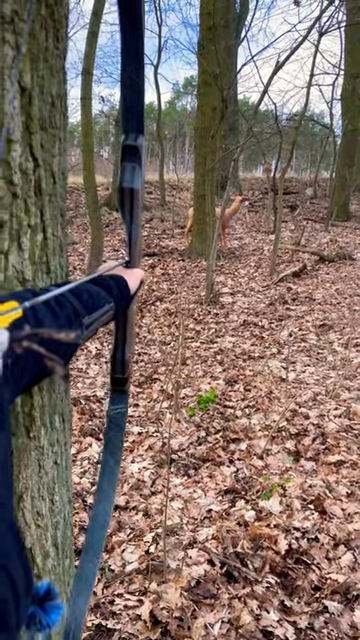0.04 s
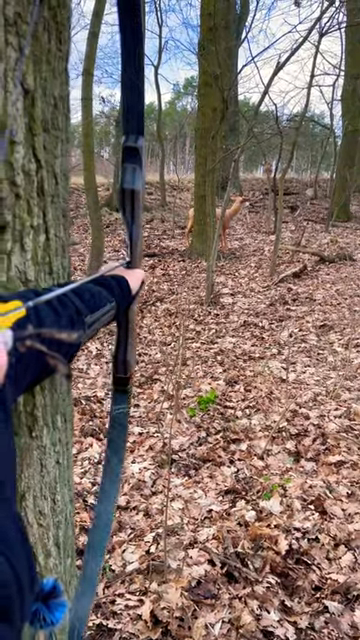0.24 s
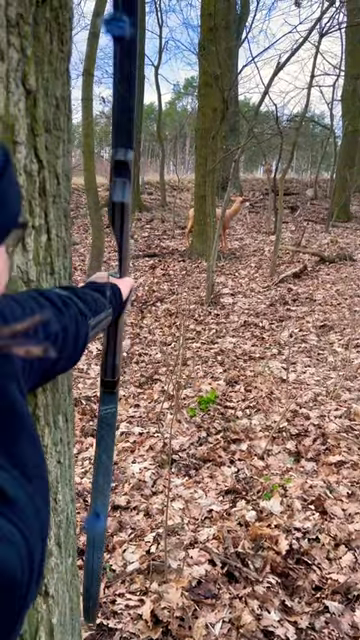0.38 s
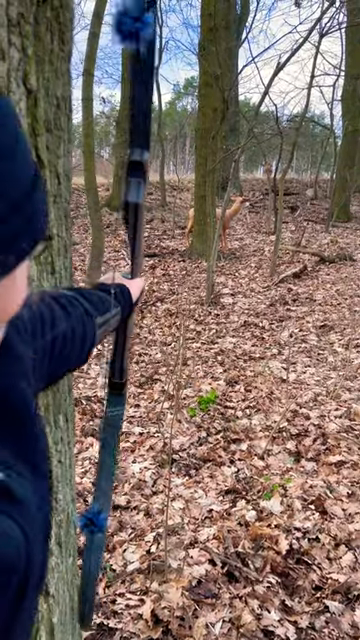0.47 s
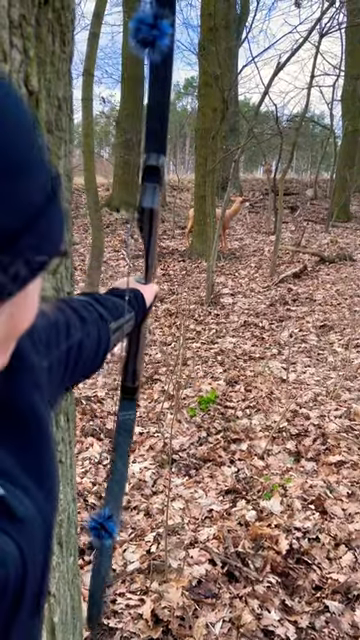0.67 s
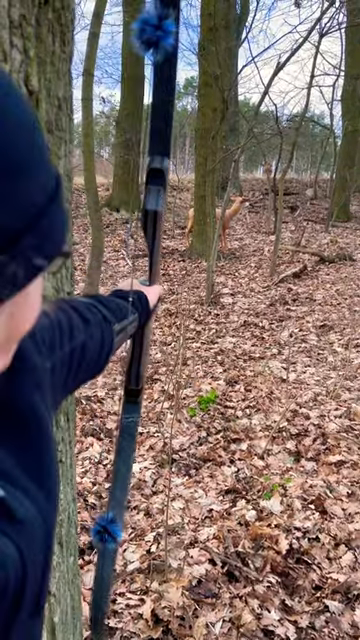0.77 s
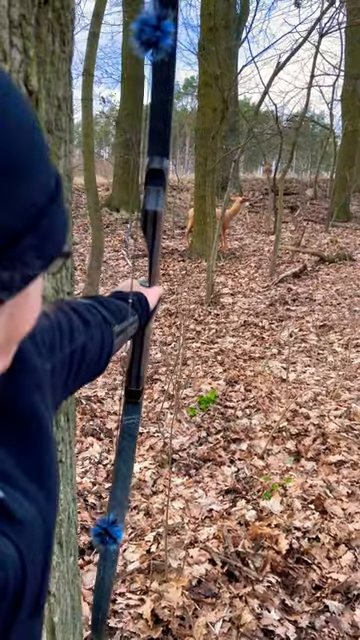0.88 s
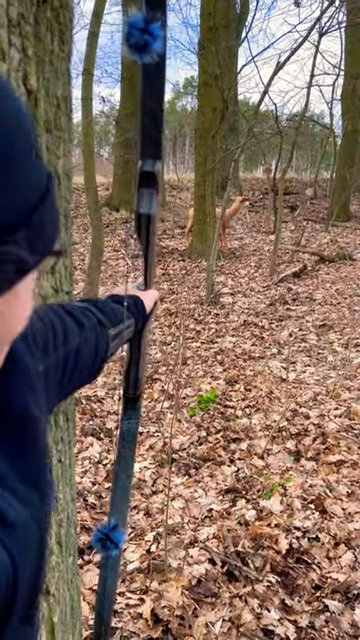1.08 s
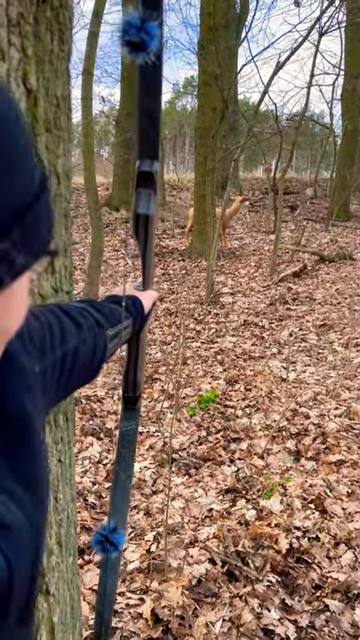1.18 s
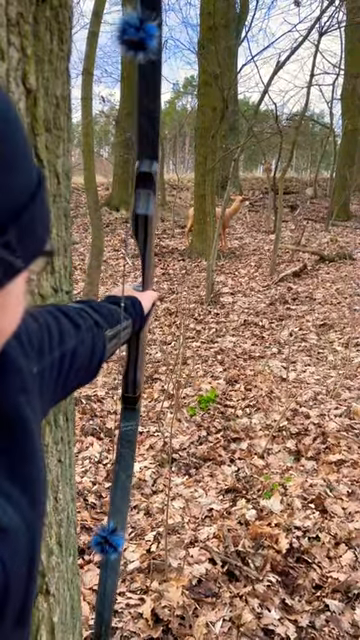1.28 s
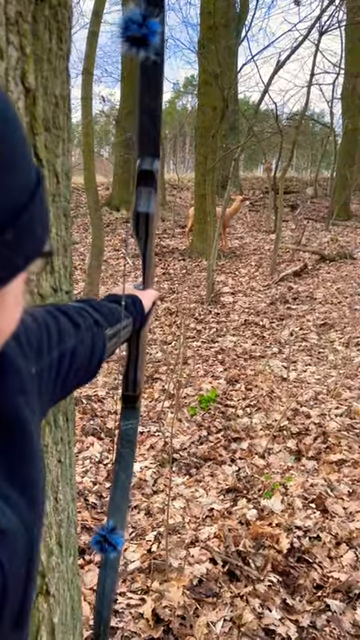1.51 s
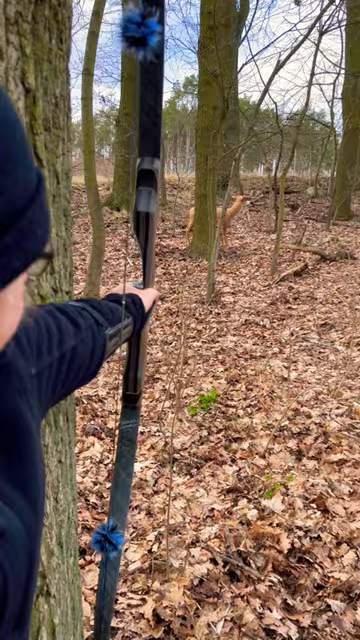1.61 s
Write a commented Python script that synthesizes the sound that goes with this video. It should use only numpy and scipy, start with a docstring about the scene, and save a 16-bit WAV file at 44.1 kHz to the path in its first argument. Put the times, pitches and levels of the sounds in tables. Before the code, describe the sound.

Bow shot, close, in a quiet forest. Faint hush until a sharp snap at 0.23 s, clattering shaft and string, a low thump at 0.25 and a short limb thrum damped by about 0.4, with rattles and airy hiss. At 0.44 the arrow knocks dully metres away, while soft low air puffs buffet the microphone until 0.8. Then near silence, tiny dry ticks around 1.2-1.3, and a faint breeze near 1.46.

```python
"""Bow loosed in a winter forest

A wooden bow is loosed close to a small stereo microphone in a quiet winter forest. The nock snaps off
(one pulse), shaft, string slam and limbs ring (decaying sines), the string rattles and hisses (shaped noise).
Eddies of stirred air buffet the microphone (soft pressure swings), and a few metres off the arrow knocks
into something (dulled modes). Behind lie dry ticks, a steady hush, a low breeze and a far thin whistle."""
import sys
import numpy as np
from scipy import signal
from scipy.fft import rfft, irfft
from scipy.io import wavfile

SR = 44100
rng = np.random.default_rng(int(sys.argv[2]) if len(sys.argv) > 2 else 0)


def bounce(signal):
    """Save signal as a 16-bit WAV file at the path given by the first command-line argument."""
    frames = np.transpose(np.atleast_2d(signal))
    limited = np.clip(frames, -1, 1)
    pcm = np.round(limited * 32767).astype(np.int16)
    wavfile.write(sys.argv[1], SR, pcm)


N = 72765
MIC_LOW_HZ = 63.4   # bass corner of the microphone
LEFT_RIGHT = np.array([[1], [-1]])


def amp(db):
    """Decibels to linear gain."""
    return 10 ** (np.asarray(db) / 20)


def rms_one(x):
    """Scale to an rms of 1."""
    return x / np.sqrt(np.mean(x ** 2) + 1e-20)


def clock():
    """Time of every sample in seconds."""
    return np.arange(N) / SR


def bins_hz():
    """Frequency of every spectrum bin."""
    return np.arange(N // 2 + 1) * SR / N


def curve(rows):
    """Gain through (time, level) rows, all but silent outside them."""
    s, db = np.transpose(rows)
    return amp(np.interp(clock(), s, db, left=-120, right=-120))


def at_hz(points, hz, column=1):
    """Read a table column at any frequency, interpolating on a log axis."""
    p = np.array(points)
    return np.interp(np.log(np.maximum(hz, 1)), np.log(p[:, 0]), p[:, column])


def swell(s, length_s):
    """Bell-shaped envelope centred on s, down to 1/e after length_s."""
    return np.exp(-((clock() - s) / length_s) ** 2)


def filtered(x, order, hz, kind="low"):
    """Butterworth filter."""
    return signal.sosfilt(signal.butter(order, hz, kind, fs=SR, output="sos"), x)


def modes(table, start_s, rise_s):
    """Struck body: decaying sines that swell over rise_s."""
    t = np.maximum(clock() - start_s, 0)
    rise = 1 - np.exp(-t / rise_s)
    ringing = 0
    for hz, db, t60_s in table:
        ringing = ringing + amp(db - 60 * t / t60_s) * np.sin(2 * np.pi * hz * t)
    return rise * ringing


def resonate(x, table):
    """Parallel (Hz, width Hz, dB) resonances with alternating signs."""
    out = 0
    for k, (hz, width_hz, db) in enumerate(table):
        r = np.exp(-np.pi * width_hz / SR)
        b = (1 - r * r) / 2 * np.array([1, 0, -1])
        a = [1, -2 * r * np.cos(2 * np.pi * hz / SR), r * r]
        out = out + (-1) ** k * amp(db) * signal.lfilter(b, a, x)
    return out


def coloured(spectrum, alike):
    """Stereo noise with a given spectrum and left-right likeness; rms 1."""
    hz = bins_hz()
    mid, side = rfft(rng.standard_normal((2, N))) * amp(at_hz(spectrum, hz))
    c = np.clip(at_hz(alike, hz), -1, 1)
    return rms_one(irfft(np.sqrt(1 + c) * mid + np.sqrt(1 - c) * side * LEFT_RIGHT, N))


def ports(x, table):
    """Phase and level difference of the two microphone ports, split evenly between them."""
    hz = bins_hz()
    phase_fades_in = np.clip(hz / MIC_LOW_HZ - .5, 0, 1)
    lead_rad = at_hz(table, hz) * phase_fades_in
    half = amp(at_hz(table, hz, column=2) / 2) * np.exp(.5j * lead_rad)
    return irfft(rfft(x * np.ones((2, 1))) * np.array([half, 1 / half]), N)


def snap():
    """The nock leaves the string: one sharp pulse with a negative and a positive lobe."""
    start_s, peak_db, pulse_hz = .2277, -7.5, 2270
    t = (clock() - start_s) * pulse_hz * np.pi
    return -amp(peak_db) * 2.3 * t * np.exp(-t * t)   # 2.3 brings the peak close to 1


def shaft():
    """Shaft and grip ring at the snap and each time the shaft brushes the grip again."""
    # modes of shaft and grip: (frequency [Hz], level within a brush [dB], t60 [s])
    shaft_modes = [(474, -28.5, 0.14), (674, -11, 0.036), (780, -24, .045), (1063, -12.5, 0.014),
                   (1370, -20, 0.033), (1894, -18.5, 0.021), (3582, -19, .03)]
    # brushes on the grip: (time [s], level [dB])
    brushes = [(.2279, -4), (.2302, -2.5), (.2318, -9.5), (.2440, -3), (.2495, -1), (.2548, -2)]
    return sum(amp(db) * modes(shaft_modes, s, rise_s=.0002) for s, db in brushes)


def thump():
    """The string slams home and the bow gives a short thump."""
    # modes of the bow body: (frequency [Hz], level [dB], t60 [s])
    thump_modes = [(201, 7.5, 0.027), (413.5, -12, 0.0805), (307, -12.5, .07)]
    return modes(thump_modes, start_s=.2460, rise_s=.0036)


def thrum():
    """The limbs swing back and ring with a wobble until the closing hand damps them."""
    # modes of the limbs: (frequency [Hz], level before damping [dB], t60 before damping [s])
    limb_modes = [(93.23, -7.5, 0.34), (131.8, -13, 0.45), (182.6, -15, 0.31), (278, -11, 0.14),
                  (308.9, -21, 0.23), (384, -22, 0.16), (518, -31.5, .15), (704, -30, .14),
                  (1417, -36.5, 0.091)]
    grip_s, grip_t60_s, wobble_db = .375, .027, -14
    wobble = rms_one(filtered(rng.standard_normal(N), 2, [60, 250], "band"))
    damping = amp(-60 * np.maximum(clock() - grip_s, 0) / grip_t60_s)
    return -damping * (1 + amp(wobble_db) * wobble) * modes(limb_modes, start_s=.2535, rise_s=.018)


def slip():
    """The string slips over the glove: a faint swell of resonant noise."""
    rub = resonate(rng.standard_normal(N), [(1550, 500, 0)])
    return amp(-54) * swell(.19, length_s=.025) * rub


def burst(s, length_s):
    """Quick rise, slower fall and a faint tail."""
    tail_db, tail_s = -11.5, .0071
    away_s = np.abs(clock() - s)
    after = np.exp(-away_s / length_s) + amp(tail_db) * np.exp(-away_s / tail_s)
    return np.where(clock() > s, after, swell(s, length_s * 0.5))


def rattles():
    """The string rattles: short noise bursts drive low and high resonances."""
    # bursts: (time [s], level before the common gain [dB], length [s], high over low drive [dB])
    bursts = [(0.2277, -13.5, 0.00077, -2.5), (.2300, -18, 0.0013, -3), (0.238, -25, 0.0024, 1),
              (0.2402, -17.5, 0.0023, 3), (0.247, -23.5, 0.0038, -6), (0.253, -18, 0.0017, 4),
              (0.2653, -25, 0.0019, 0), (0.2688, -27, 0.00091, -3.5), (.2740, -28.5, 0.0011, -6.5),
              (0.3005, -35, 0.0013, 6), (0.3057, -28, 0.0012, 0), (.3120, -27, 0.0018, -4.5),
              (.3465, -35.5, 0.0012, 5), (0.355, -30.5, 0.0012, 2.5), (0.366, -38.5, 0.0069, 3.5),
              (.3850, -39.5, 0.0012, 5), (0.395, -42.5, 0.0094, -4), (.4418, -45, 0.0015, 3)]
    # resonances of the rattle: (frequency [Hz], width [Hz], level before the common gain [dB])
    low_resonances = [(1400, 400, -9), (2455, 760, -8), (3340, 450, 0.5), (4820, 1000, -4.5)]
    high_resonances = [(6550, 5500, -8.5), (8726, 1200, -2), (11600, 1700, -7.5), (15400, 1200, -10)]
    alike, common_gain_db = .85, 7.5   # alike: left-right likeness
    common, own = rng.standard_normal(N), rng.standard_normal((2, N))
    noise = np.sqrt(alike) * common + np.sqrt(1 - alike) * own
    low_drive = high_drive = 0
    for s, db, length_s, bright_db in bursts:
        shape = burst(s, length_s)
        low_drive = low_drive + amp(db) * shape
        high_drive = high_drive + amp(db + bright_db) * shape
    low = resonate(noise * low_drive, low_resonances)
    high = resonate(noise * high_drive, high_resonances)
    return amp(common_gain_db) * (low + high)


def swish():
    """Hiss of string, wool tufts and near echoes; late on its treble drops back and flickers."""
    # swell and fade of the hiss: (time [s], level before the late dulling [dB])
    hiss_level = [(.16, -84.5), (.217, -64), (.226, -41.5), (.24, -40.5), (.28, -34.5), (.33, -50),
                  (.40, -53), (.45, -48.5), (.55, -58), (.7, -66)]
    # colour of the hiss: (frequency [Hz], relative density [dB per Hz])
    hiss_colour = [(290, -28), (500, -14.5), (764, -11.5), (1400, -15), (2360, -22.5), (8540, -26.5),
                   (15100, -35.5), (16500, -44)]
    dulls_s, dulling_s, dull_hz = .444, .027, 2380
    flicker_hz, treble_db, flicker_db = 91, -7, 3   # flicker_db: rms swing about treble_db
    flicker = rms_one(filtered(rng.standard_normal(N), 2, flicker_hz))
    hiss = coloured(hiss_colour, [(500, 0.58), (15000, 0.84)])
    dull = filtered(hiss, 4, dull_hz)
    late = np.clip((clock() - dulls_s) / dulling_s, 0, 1)
    treble_gain = 1 - late + late * amp(treble_db + flicker_db * flicker)
    return curve(hiss_level) * (dull + (hiss - dull) * treble_gain)


def bow():
    """All sounds of the bow reach the two microphone ports from one direction."""
    # ports, bow direction: (frequency [Hz], left leads [rad], left minus right [dB])
    bow_ports = [(80, -.2, -1.5), (160, -.6, -1.5), (320, -1.2, 1.5), (450, -2.0, 6), (620, -4.8, 3),
                 (800, -5.5, 1), (1200, -5.1, 4), (1800, -6.1, 2), (3600, -5.5, 2.5), (5100, -4.9, 6),
                 (8600, -5, 1), (10200, -3.2, 0), (11800, -4.7, -1)]
    release = slip() + snap() + shaft() + thump() + thrum()
    return ports(release + rattles() + swish(), bow_ports)


def eddies():
    """Air eddies at the microphone: soft pressure swings with steepened crests and some rumble."""
    # eddies: (time [s], level [dB], pitch [Hz], length [s])
    swings = [(.080, -48, 199, 0.0075), (.125, -62, 170, 0.0065), (0.182, -53.5, 204, 0.012),
              (0.4162, -29, 98.2, 0.038), (0.4339, -13, 112, 0.0063), (0.453, -17.5, 170.3, 0.0027),
              (.4670, -26, 214, 0.0088), (0.486, -30.5, 185, 0.0037), (0.525, -38.5, 202, 0.013),
              (0.542, -32, 162, 0.0096), (0.558, -33, 265, 0.0019), (0.585, -37.5, 200, 0.012),
              (0.623, -34.5, 202.7, 0.0051), (.638, -31, 193, 0.0057), (0.6447, -25, 214.3, 0.0045),
              (0.676, -46.5, 217, 0.0066), (0.6856, -30, 266, 0.0032), (0.703, -39.5, 257, 0.0082),
              (0.713, -39.5, 221.7, 0.0086), (.724, -36, 309.6, 0.0023), (.746, -37, 171, 0.0049),
              (0.782, -47.5, 252, 0.0067), (.815, -54, 139.7, .014)]
    # unsteady air between the eddies: (time [s], level [dB])
    flutter = [(0.0, -68), (0.214, -66), (0.418, -58.5), (0.58, -52.5), (0.798, -55.5), (0.9, -68.5)]
    # ports, eddies: (frequency [Hz], left leads [rad], left minus right [dB])
    eddy_ports = [(80, 2.5, 1), (115, -0.1, 5.7), (161.8, -1.33, 9.7), (246, -1.26, 4.4), (300, -2, 5.8),
                  (440, -2, 2.5)]
    overtone_db, rough_db = -10, -19
    rumble = rms_one(filtered(rng.standard_normal(N), 6, [130, 520], "band"))
    out = curve(flutter) * rumble
    for s, db, hz, length_s in swings:
        turn, shape = 2 * np.pi * hz * (clock() - s), swell(s, length_s)
        crest = amp(overtone_db) * shape * np.cos(2 * turn)
        out = out + amp(db) * shape * (np.cos(turn) + crest + amp(rough_db) * rumble)
    return ports(out, eddy_ports)


def knock():
    """The arrow lands in something that dulls the top of its modes; a little louder on the left."""
    # modes of the knock: (frequency [Hz], level within the knock [dB], t60 [s])
    knock_modes = [(559, -8.5, 0.04), (652, -1, 0.024), (760, 0.5, 0.038), (1010, -5, 0.024),
                   (1250, -8.5, 0.018), (1600, -7.5, 0.024), (1810, -1, 0.015), (2030, -16, 0.01)]
    start_s, level_db, top_hz = .4418, -25, 2150
    struck = modes(knock_modes, start_s, rise_s=.00027)
    return amp(level_db + LEFT_RIGHT) * filtered(struck, 8, top_hz)


def ticks():
    """Small dry ticks of glove and leaves: tiny rough snaps around one pitch each."""
    # ticks: (time [s], level before the resonances [dB], pitch [Hz])
    snaps = [(.178, -57, 6500), (.4905, -49, 5800), (.505, -56, 4200), (.517, -58, 5000),
             (.6328, -44, 8300), (.6672, -52, 4700), (.757, -59, 9000), (1.218, -61, 4800),
             (1.231, -55, 8800), (1.2315, -56, 2600), (1.295, -56, 4500)]
    t60_s = .007
    noise, out = rng.standard_normal((2, N)), 0
    for s, db, hz in snaps:
        t = clock() - s
        decay = (t > 0) * amp(db - 60 * np.abs(t) / t60_s)
        rough = (noise + .5 * np.cos(2 * np.pi * hz * t)) * decay
        out = out + resonate(rough, [(hz, 1600, 4), (hz / 2.2, 2500, -3)])
    return out


def breeze():
    """Low breeze on the microphone: deep noise that comes and goes."""
    # gusts: (time [s], level [dB])
    gusts = [(1.0, -99), (1.2, -72), (1.27, -64.5), (1.34, -69.5), (1.4, -65), (1.46, -54.5), (1.53, -59.5),
             (1.58, -70.5), (1.65, -66.5)]
    colour = [(40, -8), (70, 0), (130, 0), (300, -20), (1200, -80)]
    return curve(gusts) * coloured(colour, [(40, .9), (600, .8)])


def bird():
    """Far thin whistle: one steady sine under a soft swell."""
    start_s, length_s, hz, level_db = .025, .09, 6550, -82
    whistle = np.sin(2 * np.pi * hz * (clock() - start_s))
    return amp(level_db) * swell(start_s + length_s / 2, length_s / 2) * whistle


def hush():
    """Steady forest hush: coloured noise, a little louder on the left."""
    # colour of the hush: (frequency [Hz], relative density [dB per Hz])
    air_colour = [(60, -30), (110, -18), (210, -8), (350, -6), (600, -14), (1300, -23), (2050, -30),
                  (6300, -41), (9000, -41), (11000, -52), (16000, -64)]
    # width of the hush: (frequency [Hz], left-right likeness [1 = same])
    air_alike = [(60, 1), (300, 0.27), (1000, 0.6), (5000, 0.7), (12000, 0.5)]
    return amp(-61 + LEFT_RIGHT) * coloured(air_colour, air_alike)


def scene():
    """The bow close by, air and arrow after it, the forest behind."""
    return bow() + eddies() + knock() + ticks() + breeze() + bird() + hush()


def record(dry):
    """The microphone loses the deep bass and dips twice in the treble; the top is cut."""
    # treble dips: (frequency [Hz], width [Hz], depth [dB])
    dips = [(10630, 170, -9.5), (13350, 2300, -10)]
    out = filtered(dry, 2, MIC_LOW_HZ, "high")
    for hz, width_hz, db in dips:
        out = out - (1 - amp(db)) * resonate(out, [(hz, width_hz, 0)])
    # at least 70 dB down from 17 kHz up
    return signal.sosfilt(signal.cheby2(12, 70, 17000, fs=SR, output="sos"), out)


dry = scene()
out = record(dry)
bounce(out)
```